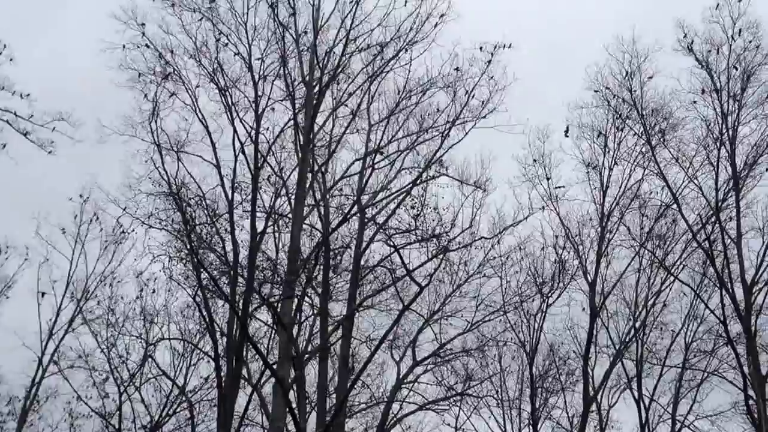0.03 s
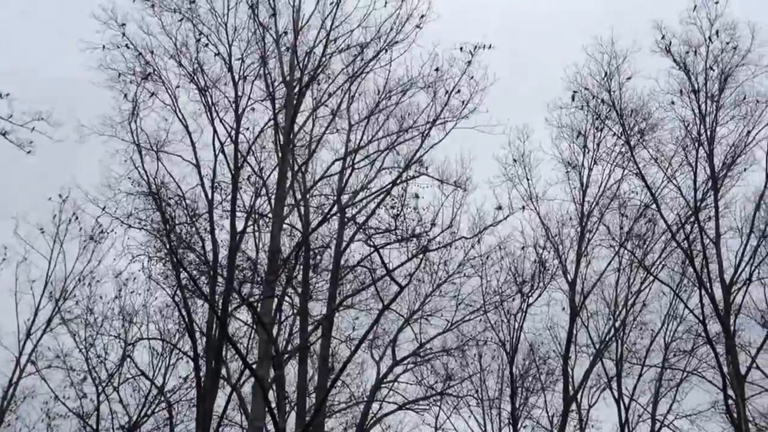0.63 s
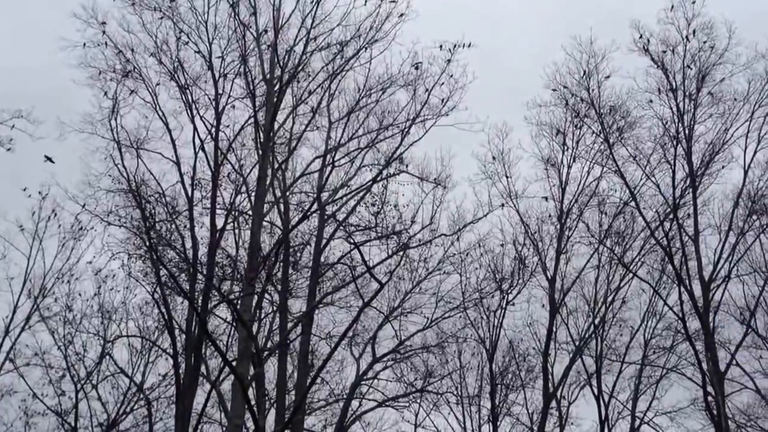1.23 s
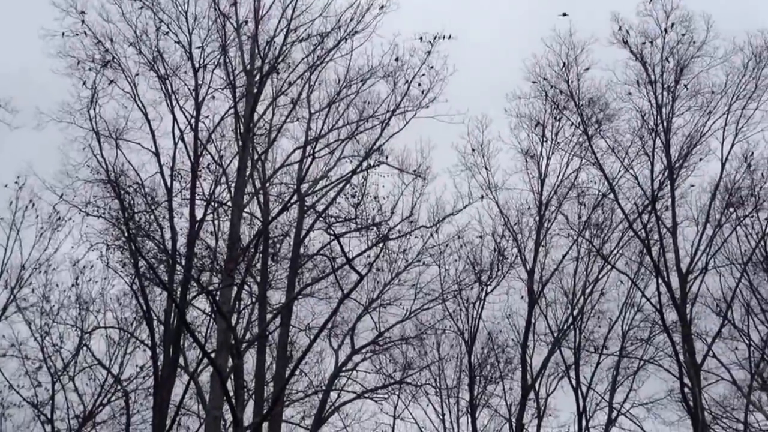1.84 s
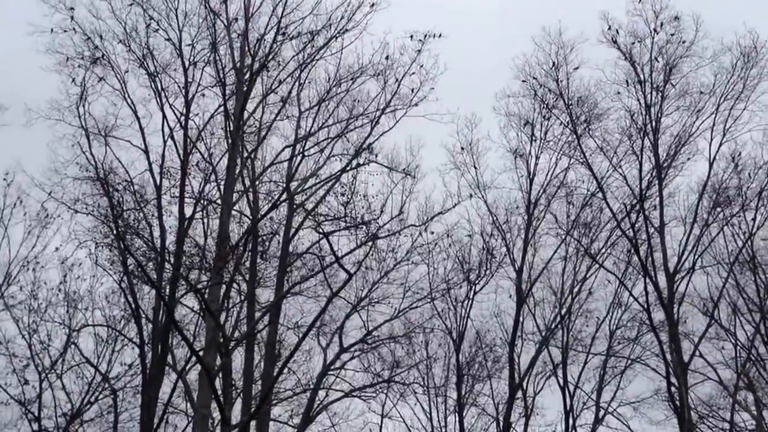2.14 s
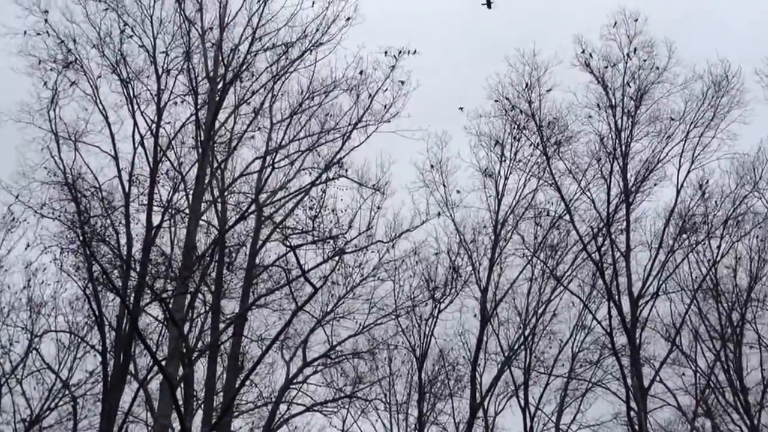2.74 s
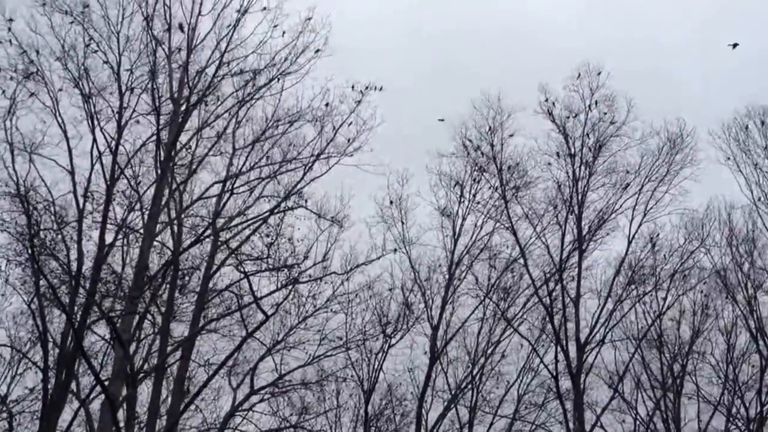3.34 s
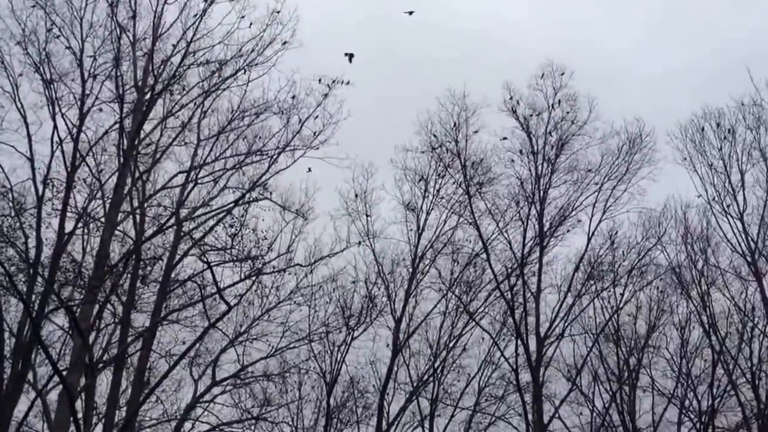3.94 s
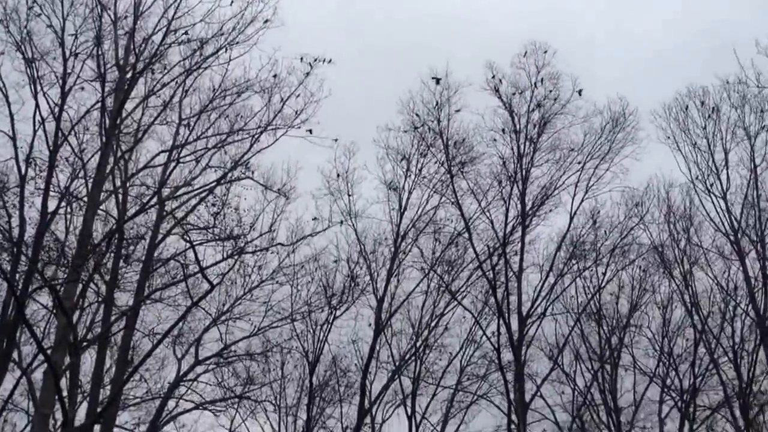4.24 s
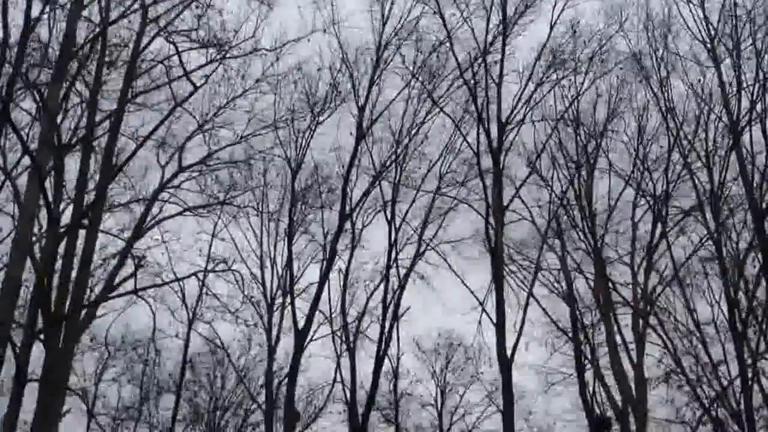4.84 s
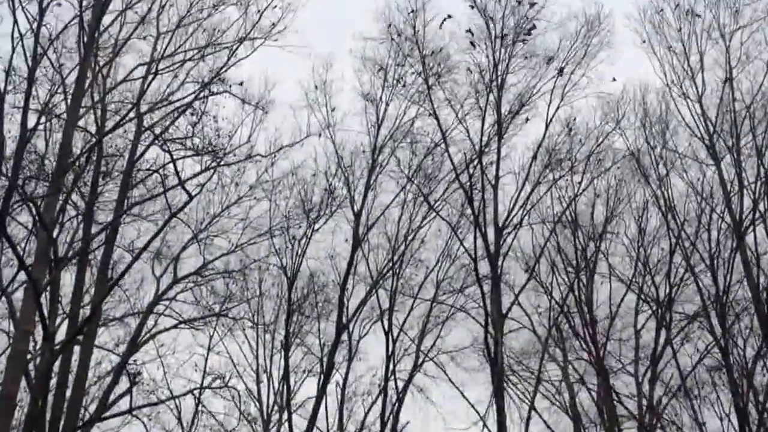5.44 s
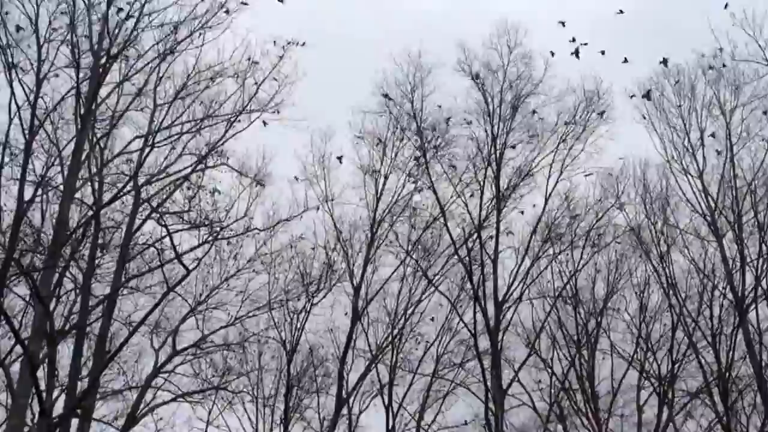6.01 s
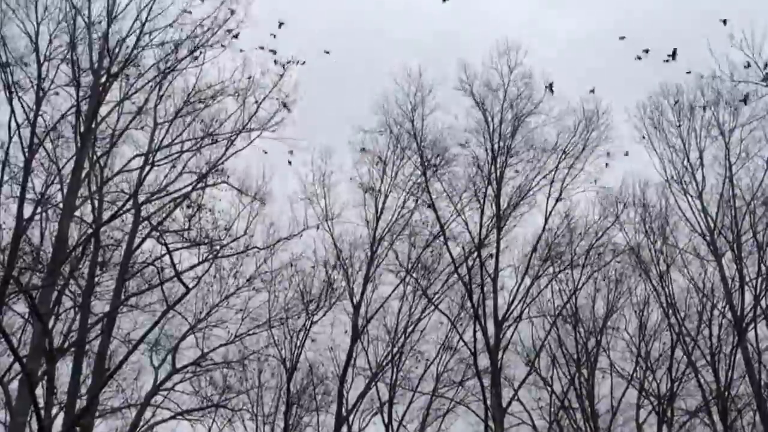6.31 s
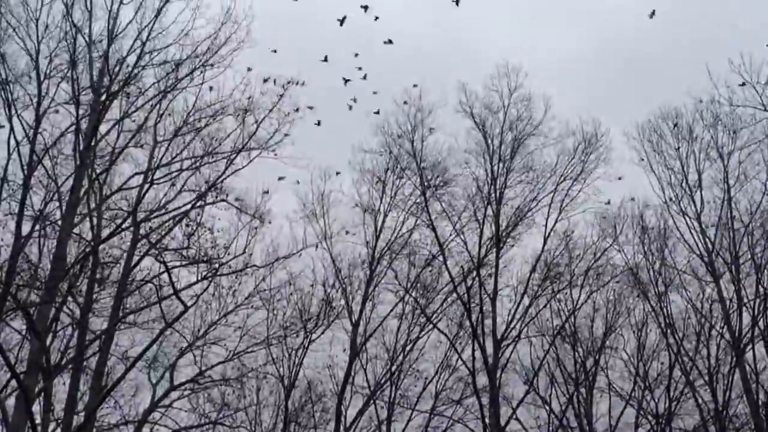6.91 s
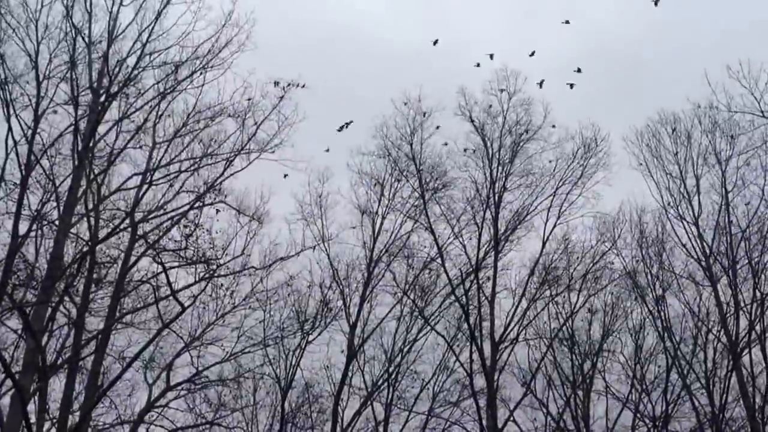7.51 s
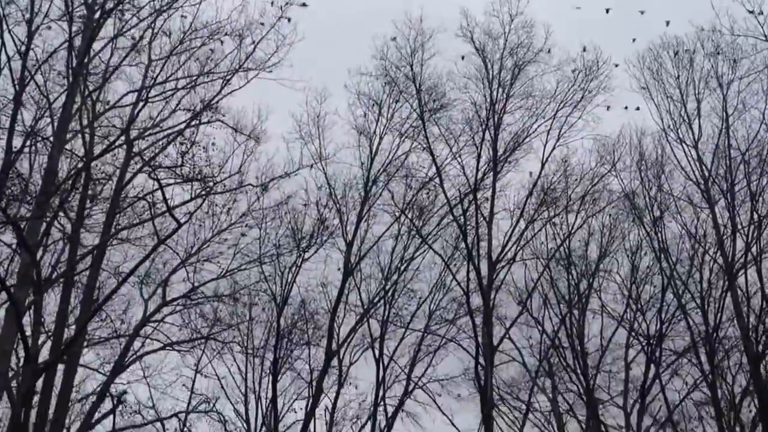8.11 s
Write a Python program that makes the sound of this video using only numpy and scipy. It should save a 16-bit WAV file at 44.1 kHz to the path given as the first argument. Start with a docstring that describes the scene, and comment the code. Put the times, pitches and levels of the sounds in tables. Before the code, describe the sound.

A large flock of birds chatters in bare trees outdoors, with nearer whistles, squeaks and buzzing rasps over a wash of distant calls. A little past halfway, five quick, heavy stomps hit a wooden deck close to the microphone, with clacking heels, booming boards and scuffing soles. The flock flares briefly, then thins to single short flight calls. A low rumble and faint hiss lie underneath.

```python
"""Starlings chatter in bare trees: whistles, squeaks and buzzing rasps over a wash of hundreds of far birds.
Five stomps hit a wooden deck close by: heels clack, the body's weight sets the boards booming, soles scuff.
The flock flares up, takes off and thins out to single flight calls. Trunks scatter calls and stomps.
A low outdoor rumble and faint hiss lie under it all, heard through one microphone."""
import sys
import numpy as np
from scipy import signal
from scipy.fft import rfft, irfft, next_fast_len
from scipy.io import wavfile
from scipy.ndimage import uniform_filter1d

SR = 44100
rng = np.random.default_rng(int(sys.argv[2]) if len(sys.argv) > 2 else 0)


def unload_wav(signal):
    """Save mono or channel-first audio to the path in sys.argv[1] as 16-bit WAV at rate SR, clipped to [-1, 1]."""
    wavfile.write(
        sys.argv[1],
        SR,
        np.round(np.clip(np.atleast_2d(signal).T, -1, 1) * 32767).astype(np.int16),
    )


N = 359856

# Far rumble up to the stomps, then after them. Each row: time in seconds, level in dB.
RUMBLE_EARLY_DB = [(0.1, -54.5), (0.98, -49), (1.52, -48), (1.67, -55.5), (1.92, -47.5), (2.74, -56.5),
                   (4.01, -53), (4.03, -47.5), (4.4, -57.5), (4.6, -45.5)]
RUMBLE_LATE_DB = [(5.55, -48.5), (6.02, -42.5), (6.39, -54.5), (6.83, -48), (7.17, -52.5), (7.36, -49),
                  (8.1, -56)]
# Spectra of the rumble and the hiss. Each row: frequency in Hz, relative level in dB.
RUMBLE_SPECTRUM = [(25, -48), (50, -56), (80, -23), (120, -11.5), (165, 1), (210, -3), (280, 1.5),
                   (360, -8.5), (480, -18.5), (800, -39), (1500, -62)]
HISS_SPECTRUM = [(100, -6), (400, 1), (1000, -3.5), (2500, -5.5), (6000, -14.5), (10000, -19),
                 (15000, -23.5)]
# Flock activity. Each row: time in seconds, chatter level in dB.
CHATTER_DB = [(.1, -41), (.55, -41.5), (.92, -37.5), (1.25, -41), (2.0, -41.5), (2.35, -39), (3.05, -40.5),
              (4.0, -39.5), (4.7, -39), (5.2, -36.5), (5.7, -41.5), (6.35, -45.5), (7.25, -58.5),
              (7.7, -52), (8.16, -59.5)]
# Spectra of the flock's rasping and shrill voices. Each row: frequency in Hz, relative level in dB.
RASPING_SPECTRUM = [(500, -24.5), (900, -14.5), (1300, -9), (1900, -4), (2500, -3.5), (3200, 0),
                    (3800, -2.5), (4400, -5), (5200, -9.5), (6500, -37)]
SHRILL_SPECTRUM = [(4000, -26), (5200, -2), (6300, 0), (7400, 0), (8500, -6), (10000, -14.5),
                   (12000, -15.5), (15000, -40)]
# Decay of the scatter from trunks. Each row: frequency in Hz, T60 in seconds.
TRUNK_T60_S = [(200, 1), (1500, 1), (4000, 0.49), (10000, 0.99)]
# Whistle registers in the nearer trees. Each row: centre in Hz, pitch spread and glide spread as
# natural-log ratios, level relative to the chatter in dB.
REGISTERS = [(3724, .11, 0.0373, -9.5), (7050, 0.1, .035, -17.5), (9300, 0.073, 0.043, -26)]
# Close whistles. Each row: start and length in seconds, start and end pitch in Hz, level in dB.
WHISTLES = [(.13, .052, 3120, 3090, -42), (0.195, 0.05, 9000, 9630, -55), (.26, 0.043, 3150, 3200, -42.5),
            (0.432, 0.032, 4640, 4600, -44), (0.873, 0.095, 6580, 6720, -47), (.904, .11, 4280, 4270, -44),
            (.911, 0.096, 7500, 8160, -49), (1.128, .1, 4610, 4180, -44.5), (1.28, .09, 7130, 7200, -51),
            (1.659, .11, 4520, 4310, -46.5), (1.664, .1, 4050, 3910, -46), (1.896, 0.14, 4340, 4340, -49),
            (2.108, 0.16, 3960, 4250, -45), (2.211, 0.036, 8900, 8560, -48),
            (2.422, 0.085, 3600, 3790, -43), (2.571, 0.057, 4300, 4580, -44),
            (2.721, 0.071, 4510, 4590, -43), (2.726, .068, 7400, 7300, -44.5), (2.82, .07, 4460, 4620, -45),
            (3.54, 0.18, 4090, 4040, -46), (3.55, .1, 3620, 3660, -42), (3.553, 0.14, 7300, 7290, -49.5),
            (3.959, 0.12, 3980, 4090, -44), (4.045, .13, 6890, 7410, -48.5), (4.09, 0.047, 3660, 3610, -43),
            (4.582, .069, 9000, 10100, -56), (5.226, 0.17, 6650, 6170, -46.5),
            (5.357, 0.055, 3660, 3680, -41), (5.374, .135, 5670, 6020, -47), (5.46, 0.081, 4090, 4230, -44),
            (5.593, 0.1, 3765, 3697, -41.5), (5.68, .1, 3513, 3510, -39.5), (5.839, 0.12, 4060, 4060, -48),
            (6.242, .05, 3894, 3900, -44.5), (6.361, 0.089, 4810, 4675, -42.5),
            (6.585, 0.09, 4430, 4350, -44), (6.928, 0.42, 7480, 7800, -65),
            (7.385, 0.081, 5130, 5670, -51.5), (7.578, .057, 3520, 3890, -50),
            (7.967, 0.028, 3320, 3220, -44.5)]
# Close screeches. Each row: start and length in seconds, centre and width in Hz, level in dB.
SCREECHES = [(0.077, 0.18, 6860, 2000, -51), (0.078, 0.12, 2700, 930, -42), (.82, 0.21, 6900, 1500, -50),
             (1.41, 0.18, 7400, 2600, -49.5), (2.1, 0.07, 6860, 3200, -46.5), (2.11, 0.066, 3720, 905, -40),
             (2.35, 0.35, 7800, 1900, -50.5), (3.27, 0.12, 8200, 2600, -51.5), (5.1, 0.14, 5870, 2800, -44),
             (7.59, 0.077, 6560, 500, -52.5), (7.84, .12, 6960, 2000, -59)]
# Five stomps and a faint last tap. Each row: start in seconds, clack level in dB, clack cutoff in Hz,
# board note in Hz, thud level in dB, lag of the body's weight in seconds.
STOMPS = [(4.660, -17.5, 2330, 1020, -23, 0.019), (4.813, -14, 5200, 1940, -11, .016),
          (4.947, -15, 1900, 1050, -16.5, 0.00504), (5.047, -13, 3650, 1704, -8, .009),
          (5.181, -17, 1700, 1304, -20.5, .010), (5.300, -44, 1200, 600, -28, 0.0039)]
# Modes of boards and joists. Each row: frequency in Hz, relative level in dB, T60 in seconds.
DECK_MODES = [(85, -14, 0.12), (146.9, -9.5, 0.46), (192.8, -3.5, 0.25), (233.3, 8.5, 0.06), (266, -22, .2),
              (321.3, -17.5, 0.43), (372, -21, 0.18), (465, -13.5, 0.25)]
# Spectra of the heel clack and the loose boards. Each row: frequency in Hz, relative level in dB.
HEEL_SPECTRUM = [(60, -34), (200, 8.5), (500, -3.5), (900, 0.5), (1200, -6.5), (1500, -2), (1800, -1.5),
                 (2300, -7.5), (3200, -8.5), (4400, -3), (7000, -18), (15000, -24)]
RATTLE_SPECTRUM = [(30, -9), (70, -5), (115, -12), (150, -0.5), (240, 1), (400, -8), (700, -11.5),
                   (1300, -28), (3000, -54)]
# Sliding soles. Each row: start and length in seconds, level in dB.
SCUFFS = [(4.902, 0.051, -33.5), (5.124, 0.073, -33), (5.229, 0.156, -45)]
# Short calls in flight. Each row: start in seconds, level in dB.
FLIGHT_CALLS = [(6.46, -48), (6.613, -48.5), (6.72, -49), (6.775, -49.5), (7.011, -47), (7.138, -49),
                (7.28, -56), (7.411, -50), (7.525, -44.5), (7.659, -53), (7.762, -50.5), (7.84, -52),
                (8.1, -49.5)]


def amp(db):
    """Decibels to gain."""
    return 10 ** (np.asarray(db) / 20)


def unit(x):
    """Scale to rms 1."""
    return x / np.sqrt(np.mean(x ** 2) + 1e-20)


def along(points, hz):
    """Interpolate (Hz, value) points on a log frequency axis."""
    knots_hz, values = np.transpose(points)
    return np.interp(np.log(hz + 1), np.log(knots_hz + 1), values)


def curve(points):
    """Interpolate (seconds, value) points to one value per sample."""
    times_s, values = np.transpose(points)
    return np.interp(np.arange(N) / SR, times_s, values)


def add(track, start_s, sound):
    """Mix a sound into a track."""
    i = int(np.clip(start_s * SR, 0, N - 1))
    track[i:i + len(sound)] += sound[:N - i]


def filtered(x, response):
    """Apply a gain given as a function of Hz."""
    size = next_fast_len(len(x) + 2048)
    return irfft(rfft(x, size) * response(np.fft.rfftfreq(size, 1 / SR)), size)[:len(x)]


def coloured(x, spectrum):
    """x through a (Hz, dB) spectrum, at rms 1."""
    return unit(filtered(x, lambda hz: amp(along(spectrum, hz))))


def patchy(depth_db, bins, frames):
    """White noise with time-frequency patches of random gain."""
    spectra = signal.stft(rng.standard_normal(N), nperseg=512)[2]
    field = uniform_filter1d(rng.standard_normal(spectra.shape), bins, axis=0)
    field = uniform_filter1d(field, frames, axis=1)
    return signal.istft(spectra * amp(depth_db * unit(field)), nperseg=512)[1][:N]


def outdoors():
    """A low rumble, like a far road, and a faint even hiss."""
    rumble_db = curve([*RUMBLE_EARLY_DB, *RUMBLE_LATE_DB])
    rumble = coloured(patchy(depth_db=1.5, bins=1, frames=24), RUMBLE_SPECTRUM)
    hiss = coloured(rng.standard_normal(N), HISS_SPECTRUM)
    return amp(rumble_db) * rumble + amp(-53.5) * hiss


def swell(length_s):
    """Syllable envelope: quick rise, slower fall."""
    progress = np.linspace(0, 1, max(int(length_s * SR), 64))
    return unit(np.abs(np.sin(np.pi * progress ** 0.78)) ** 0.63)


def rasp(length_s, centre_hz, width_hz, buzz_hz=130, depth=0.55):
    """Noise in one resonance, chopped by a buzzing syrinx or a slipping sole."""
    envelope = swell(length_s)
    noise = rng.standard_normal(len(envelope))
    voice = filtered(noise, lambda hz: 1 / (1 + ((hz - centre_hz) / width_hz) ** 2 / 2) ** 2)
    chop_hz = buzz_hz * np.exp(rng.normal(0, 0.4))
    buzz = 1 + depth * np.sin(2 * np.pi * chop_hz * np.arange(len(envelope)) / SR)
    return envelope * unit(voice * buzz)


def whistle(length_s, start_hz, end_hz, waver, flutter_db=1.5):
    """A gliding tone, wavering slightly in pitch and level."""
    envelope = swell(length_s)
    progress = np.linspace(0, 1, len(envelope))
    drift, tremble = [np.interp(progress, np.linspace(0, 1, 16), knots)
                      for knots in rng.standard_normal((2, 16))]
    hz = (start_hz + (end_hz - start_hz) * progress) * (1 + waver * drift)
    tone = np.sin(2 * np.pi * np.cumsum(hz) / SR)
    return envelope * unit(amp(flutter_db * tremble) * tone)


def squabble(count):
    """Many birds rasp at random moments."""
    out = np.zeros(N)
    starts_s = rng.uniform(0, N / SR, count)
    deviates = np.clip(rng.standard_normal((count, 3)), -2, 2)
    for start_s, (pitch, span, strength) in zip(starts_s, deviates):
        call = rasp(0.045 * np.exp(0.5 * span), 2900 * np.exp(0.22 * pitch), width_hz=800)
        add(out, start_s, amp(2.7 * strength) * call)
    return out


def squeaks(centre_hz, spread, glide, count):
    """Many birds whistle briefly at random moments around one register."""
    out = np.zeros(N)
    starts_s = rng.uniform(0, N / SR, count)
    deviates = np.clip(rng.standard_normal((count, 4)), -1.6, 1.6)
    for start_s, (pitch, slope, span, strength) in zip(starts_s, deviates):
        hz = centre_hz * np.exp(spread * pitch)
        note = whistle(0.0466 * np.exp(0.393 * span), hz, hz * np.exp(glide * slope), waver=0.0049)
        add(out, start_s, amp(1.25 * strength) * note)
    return out


def trunk_scatter(x, wet_db, build_s=0.0058):
    """Direct sound plus scatter from many trunks, at unchanged power."""
    hz, t, spectra = signal.stft(rng.standard_normal(SR), SR, nperseg=256)
    decay = amp(-60 * t / along(TRUNK_T60_S, hz)[:, None])
    tail = signal.istft(spectra * decay * (1 - np.exp(-t / build_s)), SR, nperseg=256)[1]
    echo = signal.fftconvolve(x, tail / np.linalg.norm(tail))[:N]
    return (x + amp(wet_db) * echo) / np.hypot(1, amp(wet_db))


def far_flock(perched_db=-40.5, shrill_db_per_db=1.27, takeoff_s=5.85, alarm_width_s=0.63):
    """Far birds merge into a wash with syllables in it; the busier or more alarmed, the shriller."""
    chatter_db = curve(CHATTER_DB)
    alarm_db = 3.5 * np.exp(-((np.arange(N) / SR - takeoff_s) / alarm_width_s) ** 2)
    shrill_db = -49.5 + shrill_db_per_db * (chatter_db - perched_db) + alarm_db
    rasping = coloured(patchy(depth_db=3.0, bins=4, frames=7), RASPING_SPECTRUM)
    rasping += amp(-3.5) * coloured(squabble(count=600), RASPING_SPECTRUM)
    rasping += amp(-4.5) * coloured(squeaks(3401, spread=0.17, glide=0.0252, count=480), RASPING_SPECTRUM)
    shrill = coloured(patchy(depth_db=4.0, bins=3, frames=9), SHRILL_SPECTRUM)
    shrill += amp(-4.5) * coloured(squeaks(7220, spread=0.2, glide=0.0295, count=460), SHRILL_SPECTRUM)
    return (amp(chatter_db) * trunk_scatter(unit(rasping), wet_db=-7.5)
            + amp(shrill_db) * trunk_scatter(unit(shrill), wet_db=-10.5))


def whistlers(count=48, typical_s=0.085, spread_db=3):
    """Nearer birds whistle in turn, count notes per register; their level follows the chatter."""
    out = np.zeros(N)
    for centre_hz, spread, glide, db in REGISTERS:
        starts_s = (np.arange(count) + rng.random(count)) / count * N / SR
        deviates = np.clip(rng.standard_normal((count, 4)), -1.5, 1.5)
        for start_s, (pitch, slope, span, strength) in zip(starts_s, deviates):
            hz = centre_hz * np.exp(spread * pitch)
            note = whistle(typical_s * np.exp(0.334 * span), hz, hz * np.exp(glide * slope), waver=0.008)
            add(out, start_s, amp(db + spread_db * strength) * note)
    return amp(curve(CHATTER_DB)) * trunk_scatter(out, wet_db=-2.0)


def close_birds():
    """Single birds whistle and screech in the closest trees."""
    out = np.zeros(N)
    for start_s, length_s, start_hz, end_hz, db in WHISTLES:
        add(out, start_s, amp(db) * whistle(length_s, start_hz, end_hz, waver=0.0058))
    for start_s, length_s, centre_hz, width_hz, db in SCREECHES:
        add(out, start_s, amp(db) * rasp(length_s, centre_hz, width_hz))
    return trunk_scatter(out, wet_db=-3.5)


def stomps():
    """A heel clacks on a board, the body's weight booms the deck, loose boards rattle, soles scuff."""
    out = np.zeros(N)
    t = np.arange(SR * 3 // 4) / SR

    def struck(attack_s, t60_s):
        """Impact envelope: fast rise, exponential decay."""
        return (1 - np.exp(-t / attack_s)) * amp(-60 * t / t60_s)

    boom = sum(amp(db) * np.sin(2 * np.pi * hz * t) * struck(0.0035, t60_s) for hz, db, t60_s in DECK_MODES)
    for start_s, clack_db, cutoff_hz, board_hz, thud_db, lag_s in STOMPS:
        heel = coloured(rng.standard_normal(len(t)), HEEL_SPECTRUM)
        heel = filtered(heel, lambda hz: 1 / np.sqrt(1 + (hz / cutoff_hz) ** 6))  # softer contact: duller
        heel *= struck(attack_s=0.0005, t60_s=0.12)
        board = np.sin(2 * np.pi * board_hz * t) * struck(attack_s=0.0005, t60_s=0.034)
        add(out, start_s, amp(clack_db) * (heel + amp(-3.0) * board))
        rattle = coloured(rng.standard_normal(len(t)), RATTLE_SPECTRUM)
        rattle *= struck(attack_s=0.0028, t60_s=0.34)
        add(out, start_s + lag_s, amp(thud_db) * (boom + amp(-6.5) * rattle))
    for start_s, length_s, db in SCUFFS:
        rub = rasp(length_s, centre_hz=1010, width_hz=800, buzz_hz=69, depth=0.36)
        grit = rasp(length_s, centre_hz=6000, width_hz=4500, buzz_hz=69.5, depth=0.8)
        add(out, start_s, amp(db) * (rub + amp(-19) * grit))
    return trunk_scatter(out, wet_db=-16.5)


def flight_calls():
    """Birds overhead give short rasps with a bright edge, each in its own voice."""
    out = np.zeros(N)
    for start_s, db in FLIGHT_CALLS:
        length_s = 0.039 * np.exp(rng.normal(0, 0.2))
        throat_hz = 3100 * np.exp(rng.normal(0, 0.05))
        throat = rasp(length_s, throat_hz, width_hz=560)
        edge = rasp(length_s, centre_hz=6000, width_hz=2500)
        add(out, start_s, amp(db) * (throat + amp(-13) * edge))
    return trunk_scatter(out, wet_db=-5)


def scene():
    """All sources at one microphone, alike in both channels."""
    mono = far_flock() + whistlers() + close_birds() + flight_calls() + stomps() + outdoors()
    return np.array([mono, mono])


def record(dry, silence_s=0.084, low_cut_hz=96, top_hz=15340):
    """Brief opening silence; the microphone drops deep bass and all above its band limit."""
    live = np.arange(N) / SR >= silence_s
    bass_cut = signal.butter(3, low_cut_hz, "highpass", fs=SR, output="sos")
    gated = signal.sosfilt(bass_cut, dry) * live
    return np.array([filtered(channel, lambda hz: hz < top_hz) for channel in gated])


dry = scene()
out = record(dry)
unload_wav(out)
```